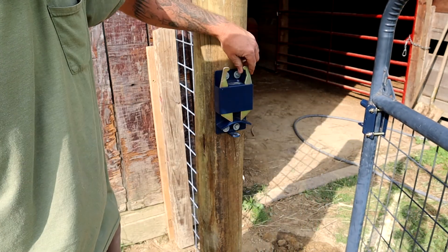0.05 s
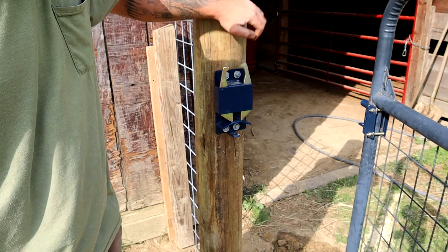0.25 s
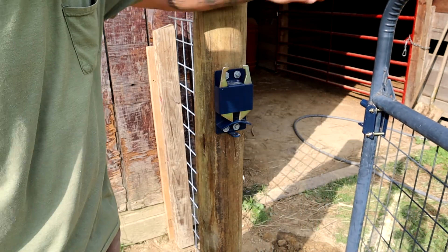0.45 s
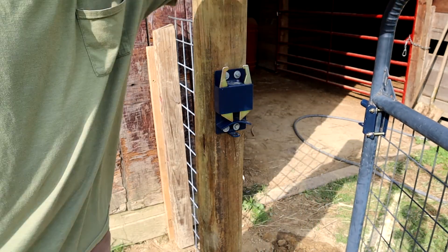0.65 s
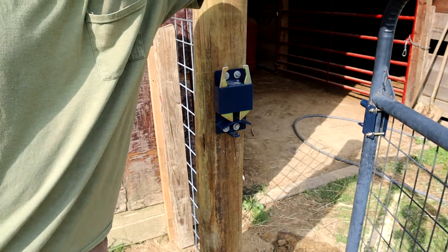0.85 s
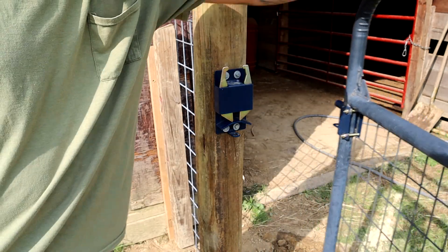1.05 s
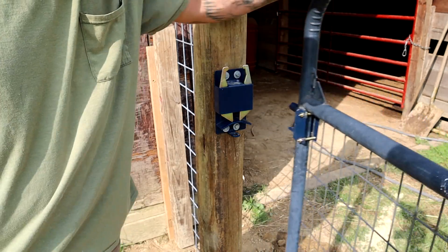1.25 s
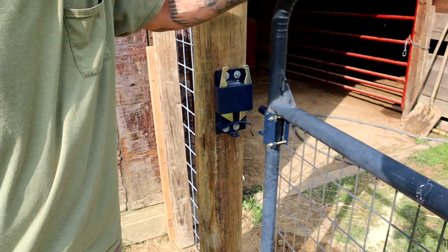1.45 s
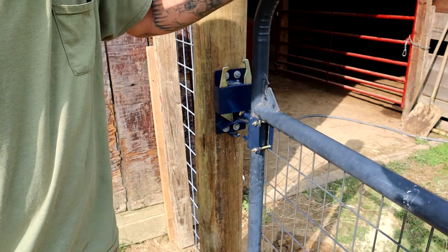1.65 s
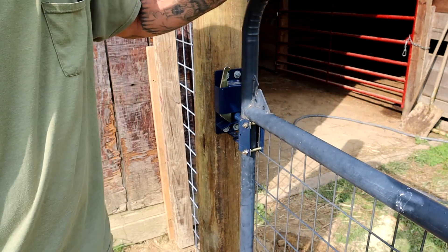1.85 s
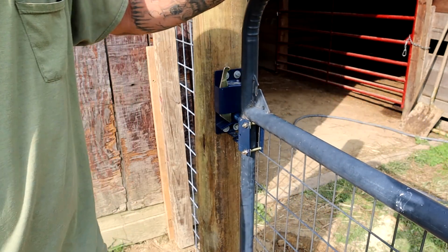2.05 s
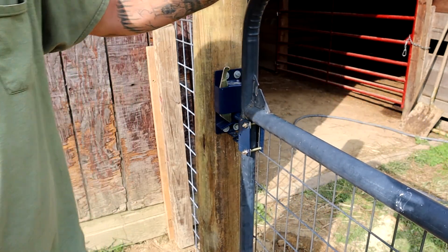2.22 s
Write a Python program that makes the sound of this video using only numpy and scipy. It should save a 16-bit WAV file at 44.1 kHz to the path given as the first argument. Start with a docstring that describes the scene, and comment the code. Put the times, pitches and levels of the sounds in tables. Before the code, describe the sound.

Close outdoor sound of a metal farm gate latch: quick clacks and a hard snap, a quiet gap with faint rustles, then the gate strikes, mesh buzzing and clanging, and the latch drops with sharp snaps.

```python
"""A hand lets go of a steel gate latch on a wooden post; its two pawls click, rattle and ring.
Two faint rustles follow. Then the tubular gate swings shut and hits the latch: the post thuds, frame
and wire mesh clang and buzz, and the pawls ride over the pin and drop. Faint outdoor air lies underneath.
Steel and wood are sums of fading tones; clacks, buzz, rustles and air are shaped noise."""
import sys
import numpy as np
from scipy import signal
from scipy.fft import irfft, next_fast_len
from scipy.io import wavfile
from scipy.ndimage import uniform_filter1d

SR = 44100
rng = np.random.default_rng(int(sys.argv[2]) if len(sys.argv) > 2 else 0)


def transcribe(u):
    """Save the signal u as a 16-bit wav file named by the first command-line argument.

    u: samples, shape (n,) or (channels, n), limited to [-1, 1]; the rate is SR.
    q: integer samples, one column per channel.
    """
    v = np.clip(np.atleast_2d(u).T, -1, 1)
    q = np.round(v * 32767).astype(np.int16)
    wavfile.write(sys.argv[1], SR, q)


N = 100812
TIME = np.arange(N) / SR  # seconds

# "T60" is the time a sound takes to fade by 60 dB.

# Colour of the outdoor air: (frequency [Hz], relative level per Hz [dB])
AIR_COLOUR = [(25, -18), (60, -12), (100, -6), (150, -9), (190, -2), (260, -3.5), (310, -3.5), (480, -5),
              (750, -5), (920, -6.5), (1200, -11), (2500, -20), (5000, -29), (8000, -39.5), (16000, -49)]
# Loudness of the air over time: (time [s], level [dB])
AIR_LEVEL = [(0, -45.5), (.7, -54), (1.0, -53), (1.3, -51), (1.6, -50)]
# Faint wavering tones in the air: (frequency [Hz], level [dB])
AIR_TONES = [(186, -65.5), (932, -61.5)]

# Faint rustles, probably of the shirt: (time [s], level [dB], half length [s])
RUSTLES = [(0.847, -71.5, 0.065), (1.247, -65.5, 0.15)]
# Colour of the rustles: (frequency [Hz], relative level per Hz [dB])
RUSTLE_COLOUR = [(500, -8), (3000, 1.5), (6000, -4), (14000, -12.5), (16000, -22)]

# Blows that shake the whole gate: (time [s], clang level [dB], post thud level [dB])
SLAMS = [(1.613, -26.5, -27.5), (1.68, -28, -50), (1.8574, -28, -51), (1.914, -31.5, -33.5),
         (2.151, -72, -40.5)]
# Tones of the wooden post: (frequency [Hz], relative level [dB], T60 [s])
POST_MODES = [(97.8, 1.5, 0.35), (118, -1.5, 0.193), (61.6, -15, 0.23)]
THUD_RISE_S = 0.012
# Colour of the wire mesh's many close tones: (frequency [Hz], relative level per Hz [dB])
MESH_COLOUR = [(50, -7), (130, -11), (300, -9.5), (550, -9.5), (900, -1), (1200, -4), (2000, -0.5),
               (3000, -3.5), (3800, 3), (4200, -10), (5200, -2), (6400, -13), (7200, -19.5), (10000, -35),
               (16000, -47)]
# How long the mesh rings: (frequency [Hz], T60 [s])
MESH_T60 = [(100, 5.4), (500, 4.4), (900, 3.2), (1400, 3.1), (2000, 2.27), (2900, 1.06), (3700, 2.44),
            (4600, 0.97), (6000, 0.44), (12000, 0.79)]
MESH_MODE_COUNT = 3000
# Colour of wires chattering against the frame: (frequency [Hz], relative level per Hz [dB])
BUZZ_COLOUR = [(200, -13), (600, -6.5), (900, -2.5), (1400, 0), (2400, 3), (3700, -2), (4300, -9),
               (5200, -5), (6400, -5), (7200, -23), (16000, -37)]
# How long the chatter lasts after a blow: (frequency [Hz], T60 [s])
BUZZ_T60 = [(800, 1.76), (3000, 1.3), (6000, 0.5), (12000, .6)]
BUZZ_DB = -4.5  # relative to the clang
TOUCHES_PER_S, TOUCH_T60_S = 110, 0.021
TOUCH_SPREAD_DB, TOUCH_COLOUR_DB = 4, 4.5  # random spread in size and in colour
# Tones of the tubular frame: (frequency [Hz], relative level [dB], T60 [s])
FRAME_MODES = [(590, -16.5, 2.6), (727, -18, 8.1), (854, -13.5, 2.8), (896, -27, 1.8), (913, -15, 2.3),
               (951, -17, 7), (965, -16.5, 5.8), (1065, -25, 5.2), (1274, -39, 0.24), (1336, -24, 0.63),
               (1462, -12.5, 1.1), (2038, -19, 3.3), (2134, -20, 2.8), (2240, -9, 1.23), (2370, -25, 2.8),
               (2760, -9, 0.75), (3070, -11.5, 1.2), (3535, -22, 0.74), (3740, -12.5, 1.8), (3800, -20, 2)]

# A pawl snaps hard onto its stop: (time [s], crack level [dB], level of the thump in the post [dB])
SNAPS = [(0.264, -11, -36), (1.873, -5.5, -30), (2.209, -30, -35)]
# Colour of the crack: (frequency [Hz], relative level per Hz [dB])
SNAP_COLOUR = [(300, 0.5), (1300, 1.5), (3000, 8), (6000, -8), (8000, -9), (16000, -23)]
# How long the crack lasts: (frequency [Hz], T60 [s])
SNAP_T60 = [(1000, 0.042), (4000, 0.032), (8000, 0.023)]
THUMP_T60_S, THUMP_HZ = 0.091, 255  # fade time and upper edge of the thump

# Contacts that single out one tone of the steel: (time [s], frequency [Hz], level [dB], T60 [s])
CLINKS = [(.0005, 5765, -46, 0.33), (.0005, 933, -38.5, 0.65), (.0245, 1328, -39.5, 0.081),
          (.0762, 5355, -49.5, 0.26), (0.1424, 5351, -44, 0.067), (0.189, 3900, -25, 0.066),
          (0.262, 1361, -17.5, 0.059), (0.2645, 6267, -21.5, 0.06), (.4354, 5900, -28, 0.042),
          (.4354, 5361, -40, 0.15), (0.46, 850, -24.5, 0.078), (0.496, 3832, -36, .14),
          (1.6125, 1365, -24, .16), (1.6133, 760, -28.5, 0.046), (1.679, 975, -23, 0.21),
          (1.9211, 4478, -30.5, 0.4), (1.9655, 4478, -40, 0.19), (2.04, 1040, -39, 0.66),
          (2.21, 4531, -22, 0.077), (2.209, 5030, -18.5, 0.053)]
# Steel contacts in the latch: (time [s], clack level [dB], extra body [dB], extra tick [dB],
# pin ring level [dB], first pawl ring level [dB], second pawl ring level [dB])
CONTACTS = [(.0005, -34, 1, -16, -56, -33.5, -63), (0.0186, -36, -1, -18, -43, -50, -57),
            (.0245, -22, 1.5, -35, -21, -45, -55), (.028, -30.5, 3, 12, -40, -43, -36),
            (0.0763, -35.5, 6, 10.5, -41, -54, -59), (0.1442, -35.5, 7, 17, -59, -67, -56),
            (.1805, -32, -12, -31, -29, -60, -55), (0.1878, -24, -3.5, 3, -40, -47, -59),
            (0.2162, -32.5, 5, -26, -30.5, -55, -64), (.226, -36.5, 2, -4, -31, -40, -54),
            (0.233, -24, -2.5, -8, -43, -50, -59), (.252, -31, 1.5, 6, -20, -52, -62),
            (0.2614, -17.5, -2, 14.5, -50, -51, -26.5), (.307, -34, -3, -6, -38, -58, -58),
            (0.323, -28.5, 7.5, -11, -31, -59, -33.5), (.3642, -27.5, 0, 12, -55, -65, -62),
            (0.3674, -16, 4, -2, -12.5, -21, -33), (0.3708, -17.5, -9, -1, -17, -38, -32),
            (.391, -36, -6, 3, -48, -30.5, -41), (0.425, -37, 8, -3, -48, -42, -42),
            (0.4358, -27, 3, 10, -25, -28, -51), (0.4501, -20, 3, -29, -18.5, -54, -42),
            (0.456, -22.5, 7, -31, -24, -54, -35), (.48, -53, -4, -6, -51, -58, -39.5),
            (0.4946, -24, 3.5, -23, -27, -58, -44), (0.5076, -28.5, 0, -24, -22.5, -59, -63),
            (0.518, -27.5, 6, -41, -43, -63, -66), (.533, -38.5, 13, -18, -51, -65, -72),
            (.544, -31.5, 8.5, -48, -46, -67, -70), (.558, -44, 16.5, -24, -38, -73, -77),
            (1.6139, -17.5, 10, -2.5, -20, -55, -51), (1.618, -21, 10, -12, -32, -55, -48),
            (1.6377, -32, -12, -12, -37, -57, -31), (1.659, -23.5, 7, 3, -15.5, -57, -25),
            (1.6781, -23, 9.5, -6, -39, -22.5, -43), (1.689, -11.5, -15, 5, -21, -26, -28),
            (1.731, -21, -16, 8, -25, -47, -48), (1.798, -33, -1, 12, -40, -33.5, -47),
            (1.8585, -18.5, -1.5, -11, -25, -57, -34), (1.865, -16, -5.5, 4, -41, -43, -59),
            (1.8722, -22, 2, 23, -11, -21, -45), (1.9212, -16, -8, -7, -10.5, -44, -27),
            (1.9635, -57, -11, 2, -41, -30, -40), (1.9816, -20, -11, 8, -40, -46, -44),
            (1.988, -21.5, 1.5, 0.5, -16.5, -50, -25), (2.04, -25.5, -5, -12, -31, -42, -42),
            (2.2094, -21.5, -8, 13.5, -12, -68.5, -34)]
# Colour of a clack: (frequency [Hz], relative level per Hz [dB])
CLACK_COLOUR = [(60, -19), (200, -10.5), (350, -11.5), (500, -6.5), (900, -1), (1100, 1), (1350, -4.5),
                (1700, -3), (2600, 2), (3400, -2.5), (4300, -8.5), (5200, 6), (6300, -25.5), (7200, -25.5),
                (11000, -26), (16000, -45)]
# How long a clack lasts: (frequency [Hz], T60 [s])
CLACK_T60 = [(100, 0.17), (1000, 0.058), (3000, 0.094), (6000, 0.043), (9000, 0.013), (16000, .03)]
# Where a heavy contact adds weight: (frequency [Hz], share of the extra body [0 to 1])
BODY_SHARE = [(1200, 1), (2400, 0.067)]
# Where a sharp contact adds edge: (frequency [Hz], share of the extra tick [0 to 1])
TICK_SHARE = [(5000, 0.096), (8000, 1)]
# How long reflections off the barn last: (frequency [Hz], T60 [s])
YARD_T60 = [(100, 1), (1000, 0.29), (4000, 0.26), (12000, 0.047)]
YARD_DB = -16  # reflections relative to the clack
CONTACT_COLOUR_DB = 2.5  # random spread in the colour of contacts
# Tones of the latch housing: (frequency [Hz], relative level [dB], T60 [s])
HOUSING_MODES = [(357.2, -27.5, 0.26), (916.6, -14, 0.16), (1241, -19, 0.16), (1335, -13.5, 0.084),
                 (1348, -14.5, 0.085), (2542, -13, 0.034), (3314, -16, 0.07), (3680, -14, 0.04),
                 (5050, -14.5, 0.06), (5900, -32.5, 0.027), (6630, -34, 0.069), (6500, -29.5, 0.045)]
# Tones of the pin: (frequency [Hz], relative level [dB], T60 [s])
PIN_MODES = [(2890, -4, 0.027), (3040, -3, 0.027), (3260, -8, 0.019)]
# Tones of the first pawl: (frequency [Hz], relative level [dB], T60 [s])
FIRST_PAWL_MODES = [(2261, -14, .13), (3030, -10, .16), (3832, 1, .14), (4605, -8, .21), (4965, -20, .2),
                    (5754, -11, .18), (9012, -27, .28), (9718, -25, .22), (10120, -33, .25),
                    (12445, -35, .25), (13910, -33, .27)]
# Tones of the second pawl: (frequency [Hz], relative level [dB], T60 [s])
SECOND_PAWL_MODES = [(1290, -11, .16), (3900, -6, .13), (4478, 0, .2), (5033, -13, .17), (5356, -11, .2),
                     (6268, -14, .11), (9050, -35, .26), (9950, -34, .28), (12480, -35, .28),
                     (13900, -33, .27)]

STRIKE_SPREAD_DB = 1.5  # random spread in how strongly a blow rings each tone
WAVER_SHARE, WAVER_HZ = 0.34, 10.6  # depth and fastest rate of the waver in loose parts
LOW_CUT_HZ, CUTOFF_HZ = 38, 16600
LIMIT_DB, RELEASE_DB_PER_S = -16, 25.5
CEILING = 0.325  # full scale is 1


def from_db(db):
    """Turn decibels into gain."""
    return 10 ** (np.asarray(db) / 20)


def rms_one(x):
    """Scale to an average strength (rms) of 1."""
    return x / np.sqrt(np.mean(x ** 2) + 1e-20)


def at_hz(points, hz):
    """Read a table between its points, on a log-frequency axis."""
    table_hz, values = np.transpose(points)
    return np.interp(np.log(hz), np.log(table_hz), values)


def low_passed(x, hz):
    """Keep what lies below a frequency."""
    return signal.sosfilt(signal.butter(2, hz, fs=SR, output="sos"), x)


def dying(times, gains, t60):
    """Envelope of blows whose energies add up and die away, with a slightly rounded attack."""
    energy = np.zeros(N)
    samples = np.clip(np.asarray(times) * SR, 0, N - 1).astype(int)
    np.add.at(energy, samples, np.square(gains))
    keep = from_db(-120 / (max(t60, 0.001) * SR))  # energy kept per sample
    fading = signal.lfilter([1], [1, -keep], energy + 1e-18)
    return uniform_filter1d(np.sqrt(fading), size=21, mode="constant")


def noise_bands(colour):
    """Noise bands, about a quarter octave wide (Hz, sound), that add up to unit rms."""
    edges = np.geomspace(28, 17000, 38)
    centres = np.sqrt(edges[1:] * edges[:-1])
    white = rng.standard_normal((2, N))  # neighbouring bands use different noise
    bands = []
    for k, hz in enumerate(centres):
        band_filter = signal.butter(2, edges[k:k + 2], "band", fs=SR, output="sos")
        bands.append(from_db(at_hz(colour, hz)) * signal.sosfilt(band_filter, white[k % 2]))
    bands = np.array(bands)
    return zip(centres, bands / bands.sum(0).std())


def waver():
    """A slow random swing in strength and phase around 1."""
    noise = rng.standard_normal((2, 2 * N))
    slow = low_passed(noise, WAVER_HZ)[:, N:]  # skip the filter's start
    return 1 + WAVER_SHARE * (rms_one(slow[0]) + 1j * rms_one(slow[1]))


def ring(modes, times, db, loose=False):
    """A body's own tones (modes) fade after each blow; loose parts also swell and waver."""
    out = 0
    for hz, mode_db, t60 in modes:
        strengths = from_db(db + mode_db + STRIKE_SPREAD_DB * rng.standard_normal(len(times)))
        tone = np.exp(2j * np.pi * (hz * TIME + rng.random()))
        if loose:
            tone = tone * waver()
        out = out + dying(times, strengths, t60) * np.sqrt(2) * tone.real
    return out


def air():
    """Soft outdoor noise with two faint wavering tones made of very narrow noise."""
    level = from_db(np.interp(TIME, *np.transpose(AIR_LEVEL)))
    out = level * sum(band for hz, band in noise_bands(AIR_COLOUR))
    for hz, db in AIR_TONES:
        peak = signal.iirpeak(hz, hz / 8, fs=SR)  # 8 Hz wide
        tone = signal.lfilter(*peak, rng.standard_normal(N))
        out = out + from_db(db) * rms_one(tone)
    return out


def rustle():
    """Soft swells of bright noise while the arm reaches for the gate."""
    swell = sum(from_db(db) * np.exp(-((TIME - start) / half) ** 2) for start, db, half in RUSTLES)
    return swell * sum(band for hz, band in noise_bands(RUSTLE_COLOUR))


def post(times, thud_db):
    """The wooden post thuds: low tones that rise softly and fade."""
    out = 0
    for start, db in zip(times, thud_db):
        age = np.maximum(TIME - start, 0)
        rise = 1 - np.exp(-age / THUD_RISE_S)
        for hz, mode_db, t60 in POST_MODES:
            fade = np.exp(-np.log(1000) * age / t60)
            out = out + from_db(db + mode_db) * fade * rise * 2 * np.sin(2 * np.pi * hz * age)
    return out


def mesh(times, db):
    """Thousands of wire modes at random pitches ring on after each blow."""
    size = next_fast_len(2 * N)
    bin_hz = np.arange(size // 2 + 1) * SR / size
    edges = np.geomspace(45, 16000, 25)
    draws = rng.random((MESH_MODE_COUNT, 2))
    # Modes are spread evenly along the square root of frequency, one in each step.
    low_root, high_root = np.sqrt(edges[0]), np.sqrt(edges[-1])
    place = (np.arange(MESH_MODE_COUNT) + draws[:, 0]) / MESH_MODE_COUNT
    hz = (low_root + place * (high_root - low_root)) ** 2
    mode_db = at_hz(MESH_COLOUR, hz) + 2 * rng.standard_normal(MESH_MODE_COUNT)
    gains = from_db(mode_db) * np.sqrt(np.sqrt(hz))  # makes up for wider spacing higher up
    lines = np.zeros(len(bin_hz), complex)
    lines[np.searchsorted(bin_hz, hz)] = gains * np.exp(2j * np.pi * draws[:, 1])
    lines /= irfft(lines, size).std()
    out = 0
    for low, high in zip(edges, edges[1:]):
        band = irfft(lines * (bin_hz >= low) * (bin_hz < high), size)[:N]
        out = out + band * dying(times, from_db(db), at_hz(MESH_T60, np.sqrt(low * high)))
    return out


def buzz(times, db):
    """Loose wires touch the frame at random, each touch with its own colour, fading after a blow."""
    touches = TIME[rng.random(N) < TOUCHES_PER_S / SR]
    sizes_db = TOUCH_SPREAD_DB * rng.standard_normal(N)[:len(touches)]
    out = 0
    for hz, band in noise_bands(BUZZ_COLOUR):
        colour_db = TOUCH_COLOUR_DB * rng.standard_normal(N)[:len(touches)]
        touch_gains = from_db(np.minimum(sizes_db + colour_db, 10))
        chatter = rms_one(dying(touches, touch_gains, TOUCH_T60_S))
        shaking = dying(times, from_db(db + BUZZ_DB), at_hz(BUZZ_T60, hz))
        out = out + band * chatter * shaking
    return out


def gate():
    """The frame clangs, the mesh shimmers and buzzes, the wooden post thuds."""
    times, clang_db, thud_db = np.transpose(SLAMS)
    frame = ring(FRAME_MODES, times, clang_db, loose=True)
    return frame + mesh(times, clang_db) + buzz(times, clang_db) + post(times, thud_db)


def snaps():
    """A hard stop gives a very short bright crack and a dull thump."""
    times, crack_db, thump_db = np.transpose(SNAPS)
    crack = 0
    for hz, band in noise_bands(SNAP_COLOUR):
        crack = crack + band * dying(times, from_db(crack_db), at_hz(SNAP_T60, hz))
    thump = rms_one(low_passed(rng.standard_normal(N), THUMP_HZ))
    return crack + thump * dying(times, from_db(thump_db), THUMP_T60_S)


def clinks():
    """Single steel tones that stand out of a contact."""
    return sum(ring([(hz, 0, t60)], [start], np.array([db])) for start, hz, db, t60 in CLINKS)


def latch():
    """Each contact clacks in its own colour, echoes off the barn and rings housing, pin and pawls."""
    times, db, body_db, tick_db, pin_db, first_db, second_db = np.transpose(CONTACTS)
    out = ring(HOUSING_MODES, times, db) + ring(PIN_MODES, times, pin_db)
    out = out + ring(FIRST_PAWL_MODES, times, first_db, loose=True)
    out = out + ring(SECOND_PAWL_MODES, times, second_db, loose=True)
    for hz, band in noise_bands(CLACK_COLOUR):
        gains = from_db(db + body_db * at_hz(BODY_SHARE, hz) + tick_db * at_hz(TICK_SHARE, hz))
        own_colour = from_db(CONTACT_COLOUR_DB * rng.standard_normal(len(times)))
        clack = dying(times, gains * own_colour, at_hz(CLACK_T60, hz))
        echo = dying(times, gains * from_db(YARD_DB), at_hz(YARD_T60, hz))
        out = out + band * np.sqrt(clack ** 2 + echo ** 2)
    return out


def scene():
    """Latch, gate, rustles and air at one close microphone, which loses the deepest bass."""
    sound = latch() + clinks() + snaps() + gate() + rustle() + air()
    low_cut = signal.butter(2, LOW_CUT_HZ, "high", fs=SR, output="sos")
    return signal.sosfilt(low_cut, sound)[None]


def record(dry):
    """Loud blows pull the gain down and it creeps back; peaks are rounded, the top is cut."""
    power = uniform_filter1d(dry[0] ** 2, size=177)  # averaged over 4 ms
    level_db = 10 * np.log10(np.maximum(power, 1e-12))
    over_db = np.maximum(level_db - LIMIT_DB, 0)
    # The gain cut jumps up with each louder blow, then shrinks at a steady rate.
    release_db = RELEASE_DB_PER_S * TIME
    held_db = np.maximum.accumulate(over_db + release_db) - release_db
    x = dry * from_db(-held_db)
    x = x / (1 + (x / CEILING) ** 8) ** (1 / 8)
    return signal.sosfilt(signal.cheby2(14, 60, CUTOFF_HZ, fs=SR, output="sos"), x)


dry = scene()
out = record(dry)
transcribe(out)
```